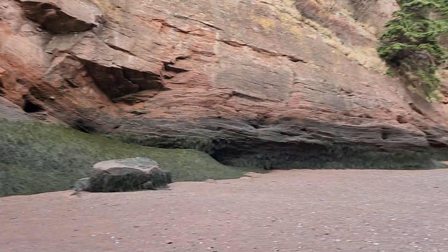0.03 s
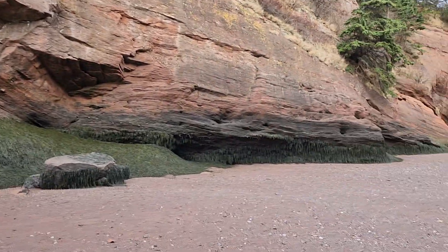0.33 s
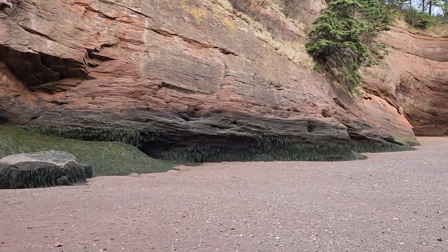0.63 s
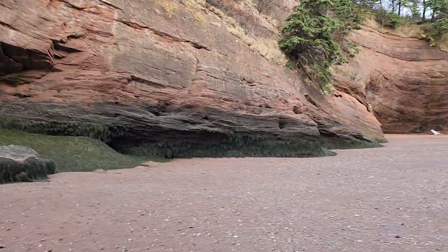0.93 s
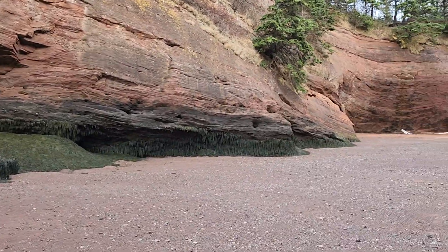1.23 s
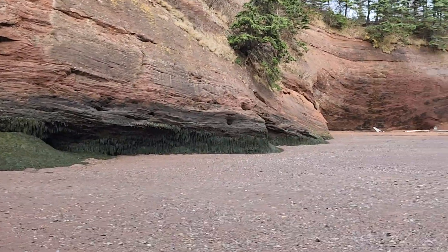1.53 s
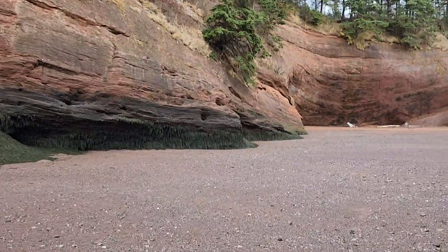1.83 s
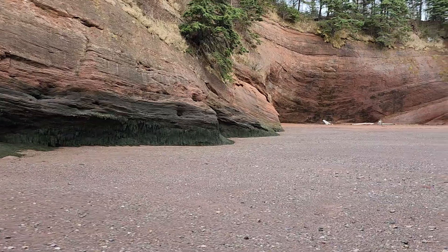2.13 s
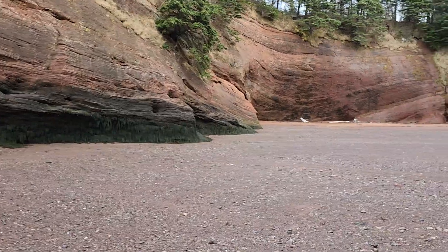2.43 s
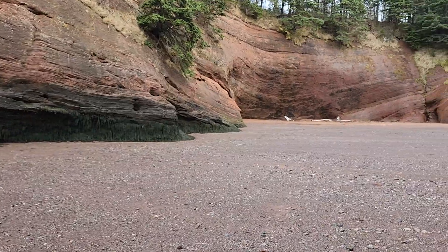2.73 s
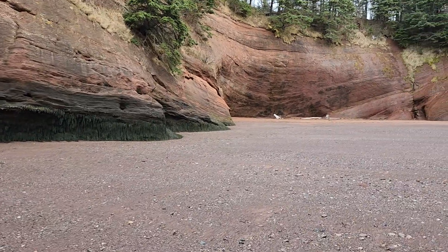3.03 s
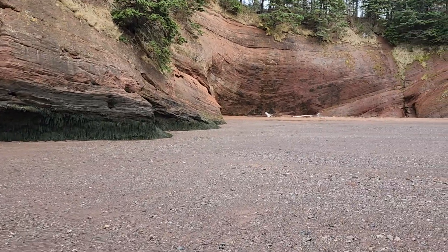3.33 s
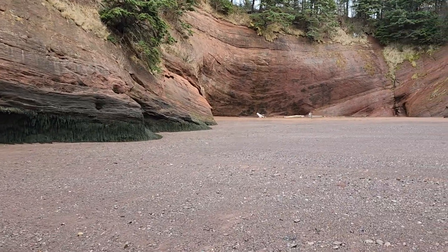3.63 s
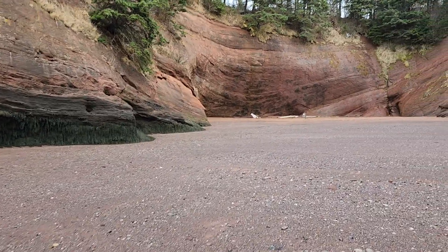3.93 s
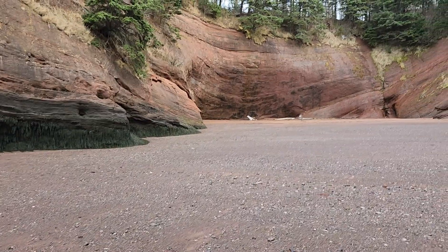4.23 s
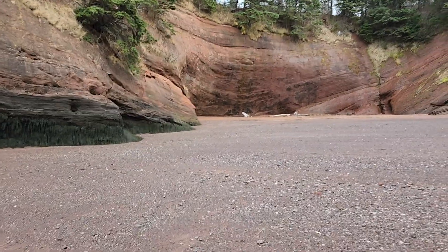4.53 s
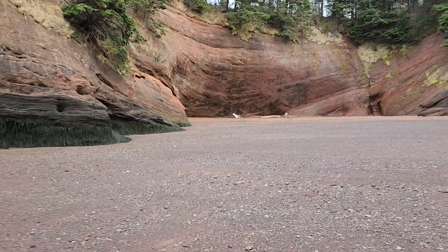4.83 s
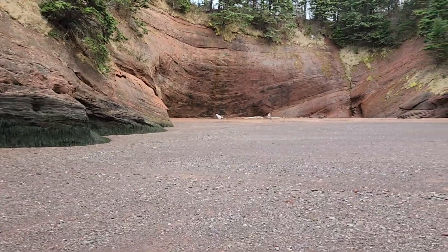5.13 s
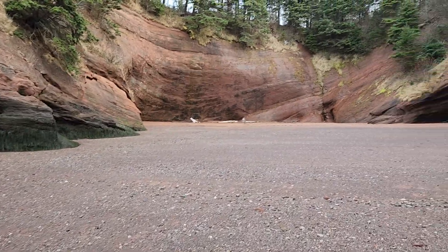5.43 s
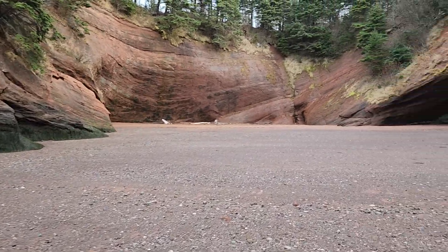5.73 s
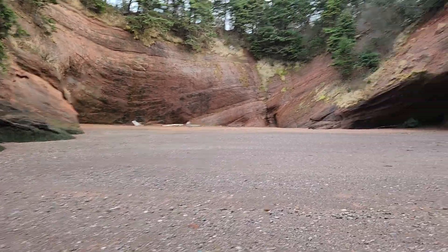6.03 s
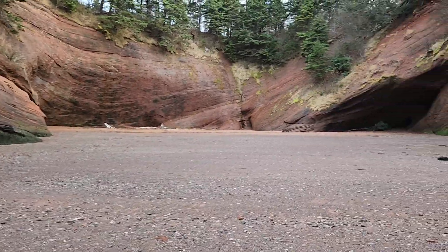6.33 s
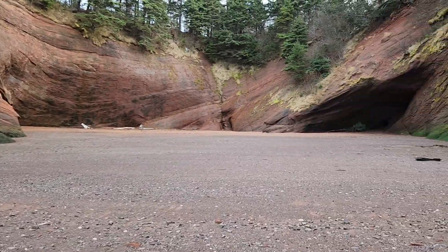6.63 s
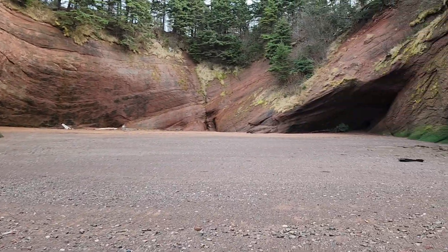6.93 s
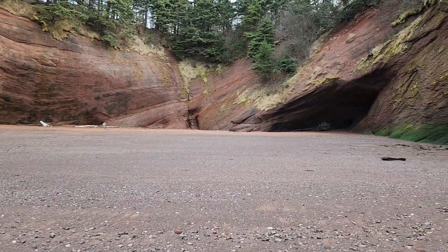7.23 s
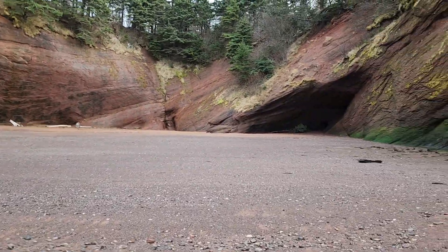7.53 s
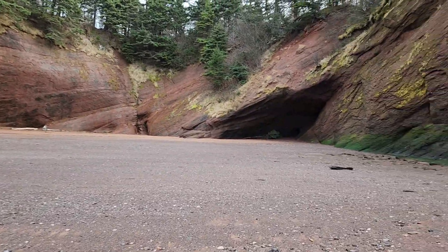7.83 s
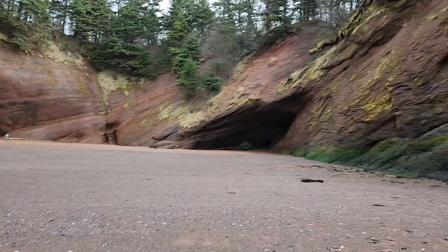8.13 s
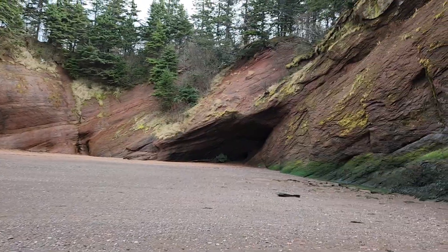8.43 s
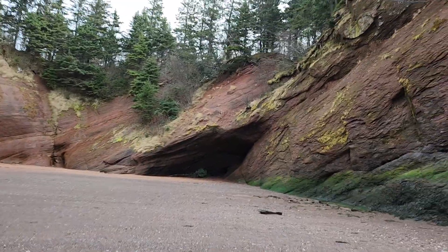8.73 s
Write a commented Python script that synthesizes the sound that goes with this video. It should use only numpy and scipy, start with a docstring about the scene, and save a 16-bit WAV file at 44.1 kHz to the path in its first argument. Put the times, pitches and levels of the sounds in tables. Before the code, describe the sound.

Someone walks evenly on gritty shingle, stones crunching and knocking, while low wind flutters on the microphone and finally buffets it.

```python
"""Footsteps on a windy pebble beach

Fourteen steps on fine pebbles, heard from a stereo microphone in the walker's hand. Each sole presses
a crunch and bright grit out of the bed, grinds coarser pockets, rolls on and scrapes off; single stones
knock, grit trickles back and sharp ticks sound close by. Wind rumbles and flutters on both microphone
ports and gusts hard near the end, over a faint shore wash and a rustling jacket."""
import sys
import numpy as np
from scipy import signal
from scipy.fft import rfft, irfft, next_fast_len
from scipy.io import wavfile
from scipy.ndimage import uniform_filter1d, map_coordinates

SR = 44100
rng = np.random.default_rng(int(sys.argv[2]) if len(sys.argv) > 2 else 0)


def bounce(signal):
    """Save signal as a 16-bit WAV file at the path given by the first command-line argument."""
    frames = np.transpose(np.atleast_2d(signal))
    limited = np.clip(frames, -1, 1)
    pcm = np.round(limited * 32767).astype(np.int16)
    wavfile.write(sys.argv[1], SR, pcm)


N = 391608

# The walk. Each row: landing in seconds, seconds to full weight, crunch in dB, seconds to push-off,
# push-off in dB, then grit and deep grinding in dB relative to the crunch.
STEPS = [(0.113, 0.068, -43, 0.16, -42.5, -8, -20), (0.772, 0.057, -42, 0.17, -47, -6, -2.5),
         (1.387, 0.069, -44, 0.19, -45, -8.5, -19), (2.063, 0.057, -41.5, 0.19, -50.5, -4.5, -8.5),
         (2.699, 0.035, -47, 0.15, -48, -7, -3.5), (3.352, 0.077, -42, 0.18, -52.5, -5.5, -4),
         (4.033, 0.072, -46.5, 0.2, -48.5, -3.5, -3), (4.732, 0.043, -44, 0.2, -53.5, -4, -0.5),
         (5.358, 0.076, -41.5, 0.19, -49, -5.5, -15), (5.997, 0.052, -41, 0.19, -49, -5, -5.5),
         (6.613, 0.071, -44.5, 0.17, -47.5, -6.5, -38), (7.282, 0.051, -44, 0.15, -51, -3, 0),
         (7.842, 0.052, -34.5, 0.22, -46.5, -9.5, -7), (8.497, 0.055, -41, 0.18, -56, -4, -22)]
# Eddies that hit the ports. Each row: start in seconds, strength in dB.
BUFFETS = [(0.23, -22), (0.326, -26), (1.079, -33), (1.223, -31), (1.254, -30.5), (3.004, -34), (7.51, -18),
           (7.59, -25), (7.611, -27), (7.638, -18.5), (7.663, -18), (7.699, -20), (7.929, -8.5),
           (8.02, -13.5), (8.051, -13.5), (8.377, -15.5), (8.405, -17), (8.444, -23), (8.611, -19),
           (8.76, -14.5)]
# Tone of pebbles, grit and an eddy's slap. Each row: frequency in Hz, level in dB.
CRUNCH_TONE = [(150, -27), (320, -2), (600, -3), (1150, 1.5), (1550, -0.5), (2000, -5), (2700, -9),
               (3600, -24.5), (8000, -53)]
GRIT_TONE = [(1500, 0.5), (2700, 8), (3800, -5), (4700, 2), (6800, 1), (8200, 2.5), (9200, -6.5),
             (10000, -11.5), (10700, -5), (12700, -0.5), (15700, -5), (16100, -38)]
EDDY_TONE = [(40, 3.5), (170, -9), (340, 4.5), (520, 2), (850, -9.5), (1300, -28.5), (2500, -52),
             (8000, -110)]


def amp(db):
    """Decibels to gain."""
    return 10 ** (np.asarray(db) / 20)


def unit(x):
    """Scale to rms 1."""
    return x / np.sqrt(np.mean(x ** 2) + 1e-20)


def split(left_over_right):
    """Share a level or phase offset between the channels: half up on the left, half down on the right."""
    return np.array([[.5], [-.5]]) * left_over_right


def along(points, hz):
    """Read (Hz, value) points on a log frequency axis."""
    freqs, values = np.transpose(points)
    return np.interp(np.log(hz + 1), np.log(freqs + 1), values)


def gains(rows):
    """A fader ride through (seconds, dB) points, fading quickly outside them."""
    times, *levels = np.transpose(rows)
    t = np.arange(N) / SR
    outside = np.abs(t - np.clip(t, times[0], times[-1]))
    fade = np.exp(-np.minimum(outside / 0.045, 20))
    return np.array([amp(np.interp(t, times, db)) for db in levels]) * fade


def wobble(rate):
    """A smooth random curve with rate knots a second."""
    knots = rng.standard_normal(int(N * rate / SR) + 4)
    fine = np.arange(10 * len(knots)) / 10
    return np.interp(np.arange(N) * rate / SR, fine, map_coordinates(knots, [fine]))


def swell(s, rise, fall):
    """A gain that grows to 1 at time s and dies away; rise and fall are time constants in seconds."""
    out = np.zeros(N)
    i = np.arange(max(int((s - 10 * rise) * SR), 0), min(int((s + 10 * fall) * SR), N))
    out[i] = np.exp(-np.maximum((s - i / SR) / rise, (i / SR - s) / fall))
    return out


def bite(s, length):
    """A gain that jumps up at time s, holds for about length seconds and lets go."""
    out, t = np.zeros(N + SR), np.arange(SR // 8) / SR
    out[round(s * SR):][:len(t)] = (1 - np.exp(-t / 0.0042)) * np.exp(-(t / length) ** 4)
    return out[:N]


def bursts(rows, rise_s, decay_s):
    """An envelope of sharp hits at (seconds, peak dB), each falling 60 dB in decay_s."""
    out, t = np.zeros(N + SR), np.arange(SR // 3) / SR
    shape = (1 - np.exp(-t / rise_s)) * amp(-60 * t / decay_s)
    for s, db in rows:
        out[round(s * SR):][:len(t)] += amp(db) * shape / shape.max()
    return out[:N]


def filtered(x, response):
    """Filter x by a complex response, given as a function of Hz."""
    size = next_fast_len(N + 8192)
    return irfft(rfft(x, size) * response(np.fft.rfftfreq(size, 1 / SR)), size)[..., :N]


def coloured(x, tone):
    """Give x a tone of (Hz, dB) points through a minimum-phase filter of energy 1."""
    size = 4096
    cepstrum = irfft(np.log(amp(along(tone, np.fft.rfftfreq(size, 1 / SR)))))
    cepstrum[1:size // 2] *= 2
    cepstrum[size // 2 + 1:] = 0
    ring = irfft(np.exp(rfft(cepstrum)))
    return signal.oaconvolve(x, ring[None] / np.linalg.norm(ring), axes=1)[:, :N]


def noise():
    """Two unrelated white noises."""
    return rng.standard_normal((2, N))


def contacts(rate, spread_db):
    """Two trains of random impacts, rate a second, rms 1: many small, a few large."""
    size = amp(spread_db * np.minimum(rng.exponential(size=(2, N)), 4))
    return unit(rng.choice([-1, 1], (2, N)) * size * (rng.random((2, N)) < rate / SR))


def patchy(x, depth_db):
    """Vary the tone in random patches, a few hundred Hz wide and some 20 ms long; rms 1."""
    spectra = signal.stft(x, nperseg=512)[2]
    patches = uniform_filter1d(rng.standard_normal(spectra.shape[1:]), size=3, axis=0)
    patches = unit(uniform_filter1d(patches, size=4, axis=1))
    return unit(signal.istft(spectra * amp(depth_db * patches))[1][:, :N])


def paired(x, likeness):
    """Blend two unrelated signals into left and right, following (Hz, correlation) points."""
    turn = lambda hz: np.arccos(np.clip(along(likeness, hz), -1, 1)) / 2
    mid, side = filtered(x, lambda hz: np.array([np.cos(turn(hz)), np.sin(turn(hz))]))
    return np.array([mid + side, mid - side])


def from_ground(x):
    """Sound from below reaches the ports out of step, and the housing shades each differently."""
    # Each row: frequency in Hz, correlation between the ports.
    likeness = [(250, 0.9), (700, 1), (1200, 0.86), (2200, 1), (3100, 0.66), (3900, 0.2), (6000, 0.14),
                (12000, 0.13)]
    # Each row: frequency in Hz, left over right in dB.
    tilt = [(700, 1), (1800, 3.5), (2800, 1), (3900, -5), (5500, -0.5), (7500, 0.5), (10000, -1.5),
            (14000, -4.5)]
    # Each row: frequency in Hz, phase of left minus right in radians.
    phase = [(1050, 0.1), (1500, -1), (2100, -1.37), (3600, -3), (4200, -4), (5200, -8.5), (7500, -10.5),
             (9000, -11)]
    ports = lambda hz: amp(split(along(tilt, hz))) * np.exp(1j * split(along(phase, hz)))
    return filtered(paired(x, likeness), ports)


def shore():
    """Water washes softly on the shore, a little nearer on the left."""
    # Each row: time in seconds, level in dB.
    wash_levels = [(0, -55.5), (.6, -59.5), (1.85, -62.5), (2.4, -63.5), (3.2, -61.5), (4.5, -63),
                   (5.7, -57), (6.4, -64), (7, -59), (7.7, -57.5), (8.3, -54), (8.88, -61.5)]
    # Each row: frequency in Hz, level in dB.
    wash_tone = [(150, -4), (400, -5), (800, 2.5), (1300, -0.5), (2000, -7.5), (3000, -13.5), (3700, -35),
                 (9000, -75)]
    wide_noise = paired(noise(), likeness=[(400, 0.42), (900, 0.68), (3000, 0.037)])
    wash = coloured(wide_noise, wash_tone) * amp(split(3))
    lapping = amp(1.3 * wobble(14))
    return gains(wash_levels) * lapping * wash


def jacket():
    """Cloth rubs in a faint crackling hiss that swells with each swing of the arm."""
    # Each row: peak time in seconds, level in dB, half length in seconds.
    swishes = [(0.077, -64, 0.48), (1.322, -66.5, 0.28), (1.872, -68.5, 0.3), (2.704, -66, 0.044),
               (3.115, -65.5, 0.51), (3.954, -63, 0.23), (4.648, -63, 0.45), (5.68, -62.5, 0.32),
               (6.94, -63, 0.17), (7.25, -65, 0.28), (7.87, -69, 0.2), (8.297, -65, 0.57)]
    # Each row: frequency in Hz, level in dB.
    cloth_tone = [(2000, -3), (3000, -3), (3700, -7.5), (5000, -2), (6700, -3.5), (7600, -3.5), (8250, 0),
                  (9100, -8.5), (10200, -14), (12500, -4.5), (15700, -10.5), (16100, -55)]
    # The jacket is on the right, so the left port is shaded.
    # Each row: frequency in Hz, left over right in dB.
    shade = [(2700, 1.5), (3600, -18), (4500, -14), (5800, -2.5), (8000, -0.5), (9500, -4), (12500, -10.5),
             (15500, -11)]
    creases = contacts(rate=300, spread_db=4.5)
    folds = amp(wobble(14))
    t = np.arange(N) / SR
    swing_power = sum(amp(db) ** 2 * np.exp(-((t - s) / width) ** 2) for s, db, width in swishes)
    resting_power = amp(-72) ** 2
    rub = np.sqrt(resting_power + amp(-3.5) * swing_power) * folds
    hiss = coloured(noise() + amp(-6) * creases, cloth_tone)
    return filtered(rub * hiss, lambda hz: amp(split(along(shade, hz))))


def wind():
    """Each port has its own puffs of rumble; eddies flutter over both and hit harder in gusts."""
    # Each row: time in seconds, level in dB.
    breeze_levels = [(0.0, -48), (0.34, -32), (0.56, -50.5), (1.6, -40), (1.68, -46.5), (2.16, -48.5),
                     (2.71, -56.5), (2.84, -51), (3.6, -44.5), (3.9, -43.5), (4.22, -45.5), (4.61, -58),
                     (5.31, -43), (5.98, -47), (6.06, -43), (6.5, -50), (6.9, -42), (8.0, -43),
                     (8.88, -37.5)]
    # Each row: peak time in seconds, flutter in dB, rumble in dB, rise and fall time in seconds.
    gusts = [(.245, -39, -51, 0.16), (1.099, -40, -38, 0.056), (1.244, -35, -33.5, .075),
             (1.97, -44, -37, 0.052), (3.03, -43, -38.5, 0.14), (3.767, -39.5, -39, 0.031),
             (2.405, -46.5, -44, 0.035), (4.475, -59, -39, 0.027), (6.06, -45.5, -33, 0.041),
             (7.621, -25, -23.5, 0.1), (7.936, -33, -30, 0.048), (8.035, -24, -26.5, 0.071),
             (8.22, -33, -34, 0.026), (8.434, -28, -28, 0.071), (8.599, -29.5, -41, 0.028),
             (8.766, -24, -41, 0.011)]
    # Which port faces the wind. Each row: time in seconds, left over right rumble in dB.
    rumble_side = [(0.0, 1.5), (1.6, 1.5), (2.7, 0), (3.8, -3), (4.3, 0.5), (4.6, -12), (5.2, 12),
                   (6.0, -0.5), (7.7, -3), (8.25, -23), (8.55, -16), (8.88, 2.1)]
    # Tone of the two wind layers. Each row: frequency in Hz, level in dB.
    rumble_tone = [(15, -18.5), (28, -17), (45, 5.5), (70, 4), (120, 1.5), (170, -4.5), (240, -11),
                   (500, -34.5), (4000, -120)]
    flutter_tone = [(90, -20), (190, -7), (310, 3.5), (420, -3), (560, -12.5), (800, -21.5), (1200, -36),
                    (2500, -73.5), (8000, -120)]
    # Each step sways the microphone through the air and lifts the breeze.
    sway_db = 5 * sum(swell(s + 0.036, rise=0.18, fall=0.18) for s, *_ in STEPS)
    breeze = gains(breeze_levels) * amp(sway_db) * amp([[-11], [1]])  # less flutter, more rumble
    gust_power = sum((amp([[flutter_db], [rumble_db]]) * swell(s, life, life)) ** 2
                     for s, flutter_db, rumble_db, life in gusts)
    flutter, rumble = np.sqrt(breeze ** 2 + gust_power)
    puffs = unit(amp(8.55 * np.tanh(np.array([wobble(30), wobble(30)]))))
    blows = bursts(BUFFETS, rise_s=0.0021, decay_s=0.07)
    pan = gains(rumble_side) ** split(1)
    pan = pan / np.sqrt(np.mean(pan ** 2, axis=0))
    low = np.hypot(rumble * pan * puffs, amp(-14) * blows) * coloured(noise(), rumble_tone)
    swirl = unit(puffs ** 0.28 * amp(4 * np.tanh(wobble(42)) + 5.8 * np.tanh(wobble(150))))
    body = (flutter * swirl + amp(-16.5) * blows) * coloured(noise(), flutter_tone)
    eddies = coloured(paired(noise(), likeness=[(300, 0.13)]), EDDY_TONE)
    slap = amp(-0.5) * blows ** 1.52 * eddies  # harder eddies are brighter
    return low + body + slap


def wind_pops():
    """Each buffeting eddy also strikes the ports with one sharp push of air."""
    kicks = np.zeros((2, N))
    for s, db in BUFFETS:
        kicks[:, round((s + .003) * SR)] = amp(db - 1) * rng.uniform(0.66, 1, 2)
    return coloured(kicks, EDDY_TONE)


def loose_pebbles():
    """Disturbed pebbles tip over in little flurries."""
    flurries = unit(amp(5 * np.tanh(wobble(16))))
    return amp(-65.5) * flurries * coloured(contacts(rate=110, spread_db=2.5), CRUNCH_TONE)


def trickles():
    """Grit runs back into a footprint in a thin scatter of ticks."""
    # Each row: peak time in seconds, level in dB, rise and fall time in seconds.
    runs = [(4.92, -69, .06), (5.66, -58, 0.12), (6.97, -62, .09)]
    # Each row: frequency in Hz, level in dB.
    trickle_tone = [(1000, -5), (5500, -6.5), (8200, 4), (9300, -9), (16000, -17)]
    flow = sum(amp(db) * swell(s, life, life) for s, db, life in runs)
    return flow * coloured(contacts(rate=900, spread_db=2.5), trickle_tone)


def ticks():
    """Tiny hard contacts close by, a little to the left: a snap and brief chatter over a lower clack."""
    # Each row: start in seconds, snap in dB, clack in dB.
    hits = [(1.8898, -29.5, -38), (1.9584, -39, -47), (1.9695, -39, -40), (2.039, -50, -28.5),
            (2.0443, -50, -35.5), (3.8646, -37, -47), (3.9566, -22, -28.5), (4.084, -33, -30),
            (4.1635, -37, -43), (4.242, -33, -34), (4.2505, -30.5, -27), (4.3313, -26, -28),
            (5.4945, -43, -33), (5.9896, -34, -33.5)]
    # Tone of the snap and of the clack. Each row: frequency in Hz, level in dB.
    snap_tone = [(3500, -36), (8000, -22), (10000, -4), (13000, 5), (15500, 9), (17000, -17)]
    clack_tone = [(500, -7), (1500, 3), (2700, -2), (3700, -9), (4800, -0.5), (6200, -2.5), (8000, 3.5),
                  (9500, -5), (13000, -33)]
    snaps, clacks = np.zeros((2, 2, N))
    t, pan_db = np.arange(SR // 100) / SR, split(2.5)
    for s, snap_db, clack_db in hits:
        for layer, db in ((snaps, snap_db), (clacks, clack_db)):
            chatter = amp(-14.5 - 60 * t / 0.012) * rng.standard_normal((2, len(t)))
            chatter[:, 0] = 1.08  # the first contact
            layer[:, round(s * SR):][:, :len(t)] += amp(db + pan_db) * chatter
    return amp(2) * (coloured(snaps, snap_tone) + coloured(clacks, clack_tone))


def stone_knocks():
    """A shifting stone clacks against its neighbours with a hollow, quickly damped ring."""
    # Each row: start in seconds, level in dB, pitch in Hz.
    stones = [(0.172, -25, 830), (0.837, -25, 1010), (0.881, -23.5, 1140), (0.93, -30, 1080),
              (1.053, -33.5, 1090), (2.039, -24.5, 1120), (2.082, -28, 760), (2.621, -36, 1160),
              (2.764, -27, 1050), (3.509, -24.5, 1570), (3.766, -34.5, 1240), (3.784, -33.5, 1330),
              (4.748, -35, 1270), (4.779, -28, 1130), (4.868, -27, 1110), (5.456, -24.5, 1130),
              (6.053, -35, 947), (6.357, -43, 1110), (6.574, -22.5, 850), (6.686, -25.5, 1220),
              (6.904, -40.5, 1530), (7.213, -31, 900), (8.054, -22.5, 900)]
    rattle_rate, rattle_s, ring_s = 1500, 0.059, 0.0076  # contacts a second; times to fall 60 dB
    out, t = np.zeros((2, N + SR)), np.arange(SR // 12) / SR
    for s, db, hz in stones:
        rattle = rng.standard_normal((2, len(t))) * (rng.random((2, len(t))) < rattle_rate / SR)
        rattle *= amp(-60 * t / rattle_s)
        rattle[:, 0] += 1.5  # the first contact
        ring = np.sin(2 * np.pi * hz * t) * amp(-60 * t / ring_s)
        clack = signal.fftconvolve(rattle, ring[None], axes=1)[:, :len(t)]
        clack /= np.abs(clack).max(axis=1, keepdims=True)
        out[:, round(s * SR):][:, :len(t)] += amp(db - 7) * clack
    body_eq = [(200, -12), (600, 5.5), (2400, 0.5), (3700, 3.0)]  # Hz, dB
    return filtered(out[:, :N], lambda hz: amp(along(body_eq, hz)))


def toe_scrapes():
    """Each push-off builds to a bright scrape of the toes, which stops as they lift."""
    # Each row: frequency in Hz, level in dB.
    scrape_tone = [(600, -22), (1400, 7), (2200, 0.5), (3000, 3), (3700, -9.5), (5000, -13), (9000, -26),
                   (14000, -41)]
    flick = sum(amp(push_db) * swell(s + push_s + 0.028, rise=0.11, fall=0.025)
                for s, _, _, push_s, push_db, _, _ in STEPS)
    return amp(-5) * flick * coloured(contacts(rate=2000, spread_db=0.8), scrape_tone)


def grinds():
    """A pocket of coarse pebbles gives way in a short run of knocks, crushing grit between them."""
    # Each row: start in seconds, level in dB.
    pockets = [(.178, -48), (.845, -42.5), (0.923, -37.5), (2.08, -40), (2.129, -38), (2.755, -43.5),
               (2.823, -42.5), (3.424, -41), (3.49, -40), (4.764, -38.5), (5.42, -42.5), (6.046, -40),
               (6.69, -46), (7.876, -35.5)]
    # Each row: frequency in Hz, level in dB.
    coarse_tone = [(200, -25.5), (450, -0.5), (800, 0), (1200, -0.5), (1700, -2.5), (2600, -8.5),
                   (3600, -23.5), (8000, -51)]
    slip = sum(amp(db) * bite(s, length=0.031) for s, db in pockets)
    knocks = coloured(contacts(rate=700, spread_db=1.8), coarse_tone)
    crushed = coloured(contacts(rate=3500, spread_db=4), GRIT_TONE)
    return slip * (knocks + amp(-16) * crushed)


def clinks():
    """Single pebbles ring for a few cycles as the bed gives way, each at its own pitch; rms 1."""
    per_second, centre_hz, spread_octaves, decay_cycles = 190, 1303, 0.539, 4.7
    t = np.arange(SR // 40) / SR
    when, force, up, down = rng.random((int(per_second * N / SR), 4)).T[:, :, None]
    size = amp(-4 * np.log(np.maximum(force, .05)))
    hz = centre_hz * 2 ** (spread_octaves * np.sqrt(6) * (up - down))
    rings = size * np.sin(2 * np.pi * hz * t) * np.exp(-hz * t / decay_cycles)
    samples = (when * N).astype(int) + np.arange(len(t))
    return unit(np.bincount(samples.ravel(), rings.ravel(), N)[:N])


def scuffs():
    """Crunch and grit gains of a swinging foot that grazes the pebbles."""
    # Each row: peak time in seconds, level in dB.
    grazes = [(0.088, -50.5), (2.42, -59), (2.625, -52.5), (3.25, -61), (3.33, -52.5), (5.289, -49),
              (5.36, -47.5), (6.39, -57)]
    return sum(amp(db) * swell(s, rise=0.04, fall=0.04) for s, db in grazes) * amp([[0], [-9.5]])


def heels():
    """Crunch and grit gains of a heel digging in."""
    # Each row: start in seconds, crunch in dB, grit in dB, length in seconds.
    strikes = [(1.41, -48, -45, 0.033), (2.015, -35, -48, 0.04), (2.715, -39.5, -51, 0.03),
               (5.949, -40.5, -50.5, 0.032), (6.574, -41, -43.5, 0.041)]
    return sum(amp([[crunch_db], [grit_db]]) * bite(s, length)
               for s, crunch_db, grit_db, length in strikes)


def soles():
    """Crunch, grit and grinding gains: each sole takes the weight, rolls on to the toes and pushes off."""
    def load(progress, sharpness):
        """A hump of pressure that peaks when progress reaches 1."""
        return (progress * np.exp(1 - progress)) ** sharpness

    attack_s, roll_s, release_s = 0.0092, 0.29, 0.068
    power, t = np.zeros((3, N + SR)), np.arange(SR) / SR
    for s, weight_s, crunch_db, push_s, push_db, grit_db, deep_db in STEPS:
        before, after = np.maximum(push_s - t, 0), np.maximum(t - push_s, 0)
        roll = np.exp(-before / roll_s - (after / release_s) ** 2)
        push = amp(push_db) * (1 - np.exp(-t / attack_s)) * roll
        crunch = np.hypot(amp(crunch_db) * load(t / weight_s, sharpness=1.6), push)
        grit_s = 0.8 * weight_s  # the grit on top gives way sooner
        grit = np.hypot(amp(crunch_db) * load(t / grit_s, sharpness=2.2), push)
        layers = np.array([crunch, amp(grit_db) * grit, amp(deep_db) * crunch])
        power[:, round(s * SR):][:, :SR] += layers ** 2
    return np.sqrt(power[:, :N])


def footsteps():
    """The bed yields in small slips: pebbles crunch, grit crackles on top and deeper layers grind."""
    # Each row: frequency in Hz, level in dB.
    deep_tone = [(120, -32), (330, 0.5), (750, -5), (1100, -4), (1800, -8), (8000, -99)]
    pressure = soles()
    crunch, grit = np.hypot(pressure[:2], heels() + scuffs())
    sinking = pressure[2]
    slips = unit(amp(1.6 * (wobble(60) + 0.5 * wobble(220))))
    pebbles = coloured(contacts(rate=2000, spread_db=2) + amp(-13) * noise(), CRUNCH_TONE)
    pebbles = patchy(pebbles, depth_db=3.5)  # each slip moves stones of other sizes
    pebbles = unit(pebbles + amp(-3) * np.array([clinks(), clinks()]))
    below = coloured(contacts(rate=2500, spread_db=2), deep_tone)
    grains = coloured(contacts(rate=7700, spread_db=3.5) + amp(-21) * noise(), GRIT_TONE)
    grains = patchy(grains, depth_db=2.5)
    return slips * (amp(-1.65) * crunch * pebbles + sinking * below + amp(-1) * grit * grains)


def scene():
    """Feet and stones on the ground, with ticks, wind, shore and jacket."""
    ground = footsteps() + grinds() + toe_scrapes() + stone_knocks() + loose_pebbles() + trickles()
    return from_ground(ground) + ticks() + wind() + wind_pops() + shore() + jacket()


def record(dry):
    """A brick-wall low-pass takes off the very top of the treble."""
    return filtered(dry, lambda hz: hz < 16600)


dry = scene()
out = record(dry)
bounce(out)
```